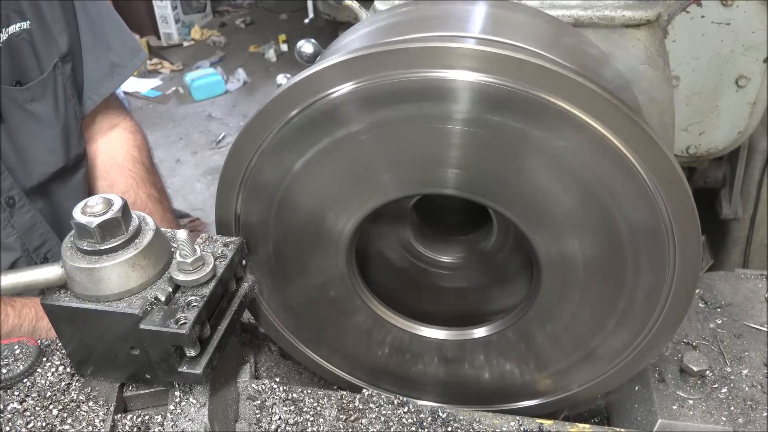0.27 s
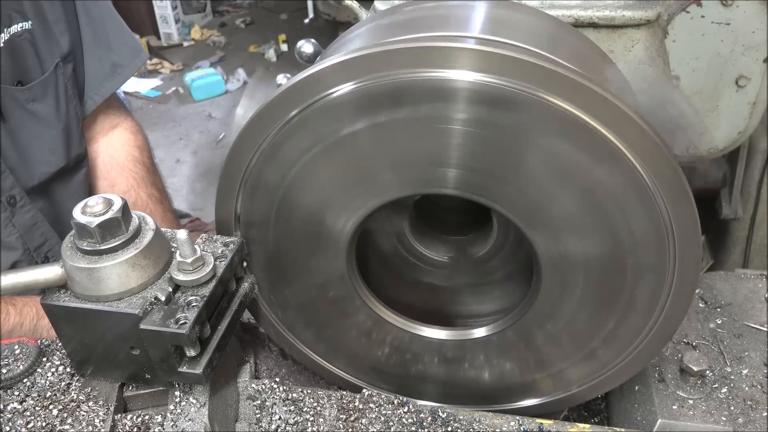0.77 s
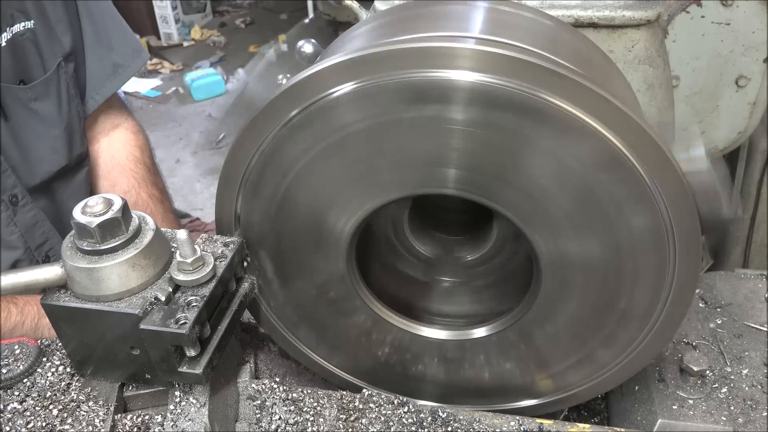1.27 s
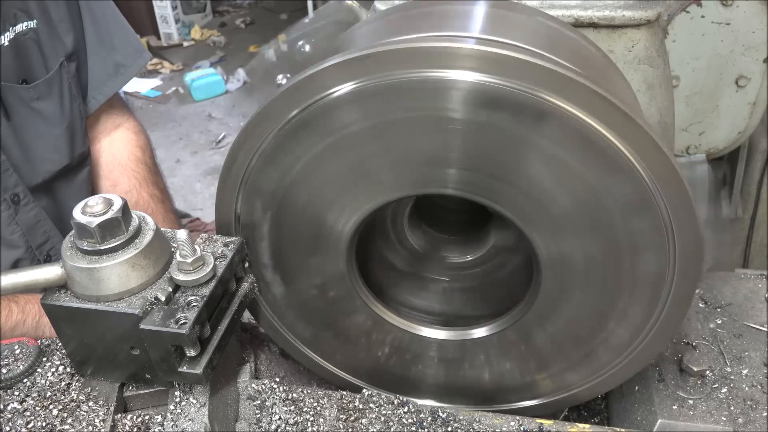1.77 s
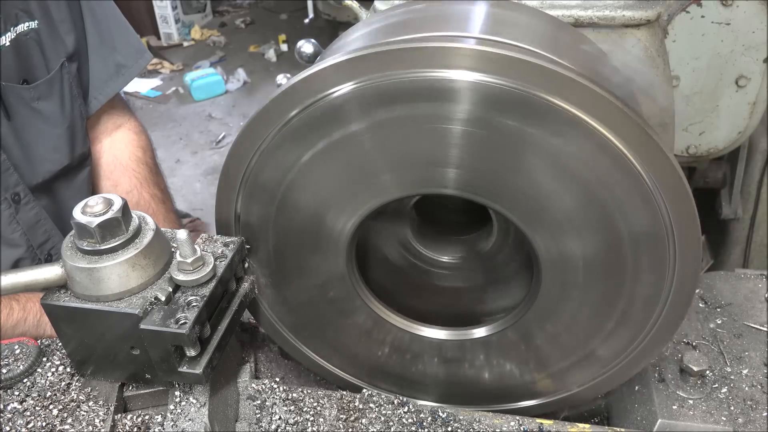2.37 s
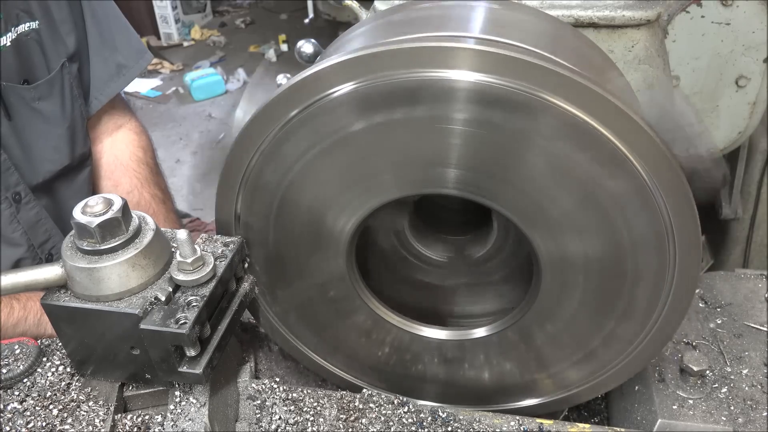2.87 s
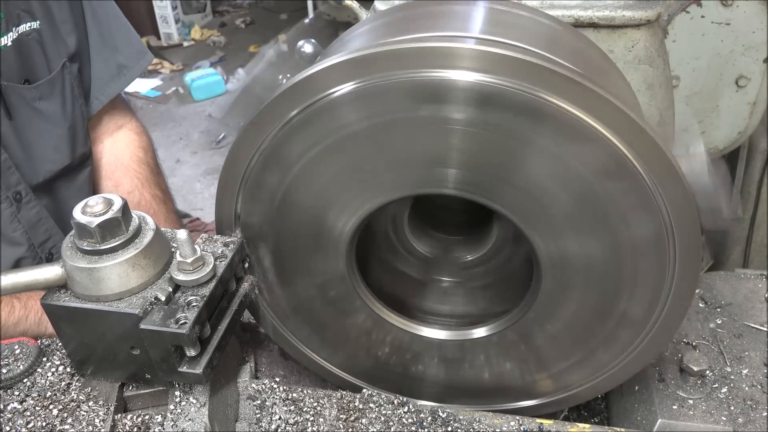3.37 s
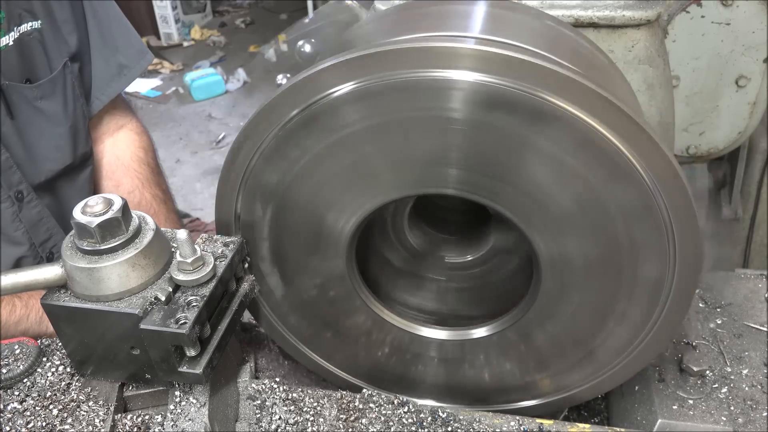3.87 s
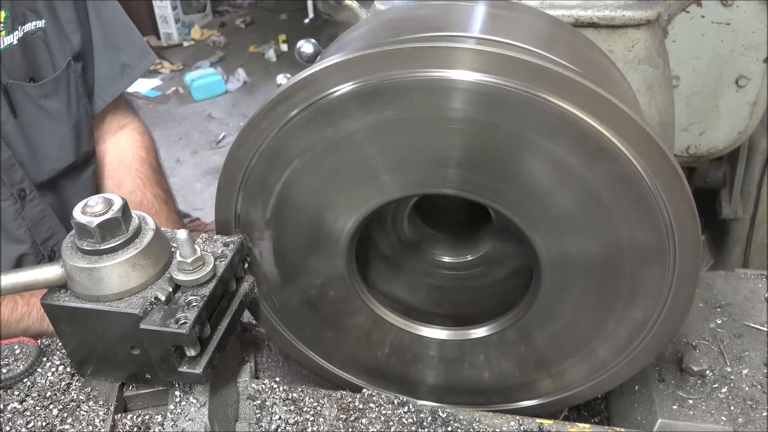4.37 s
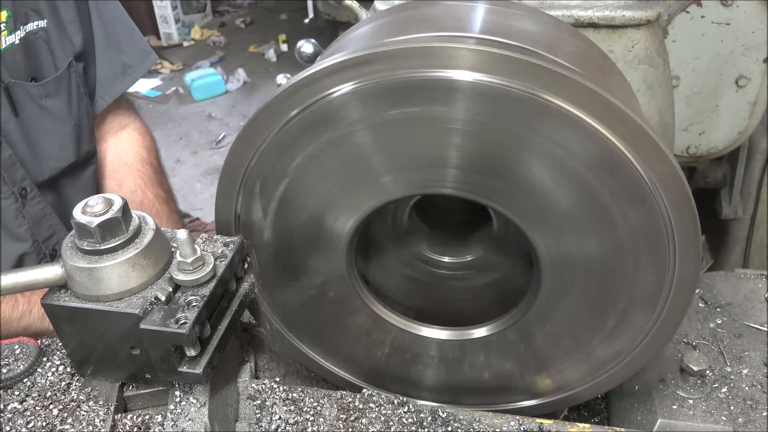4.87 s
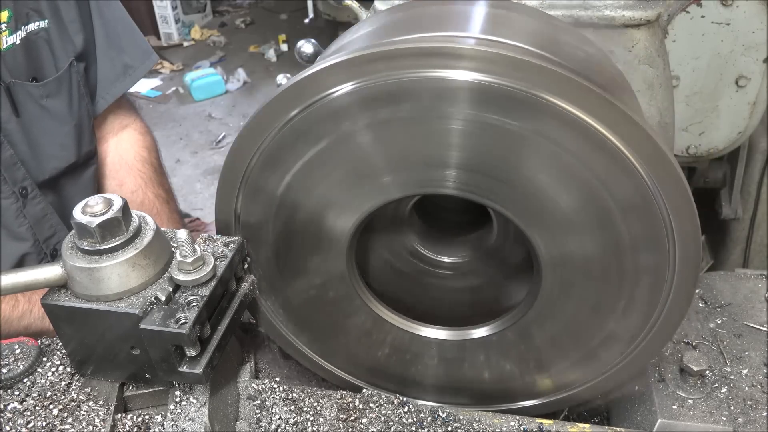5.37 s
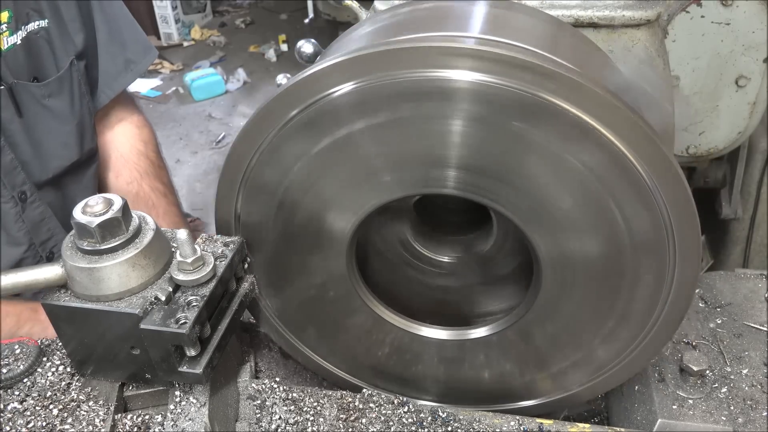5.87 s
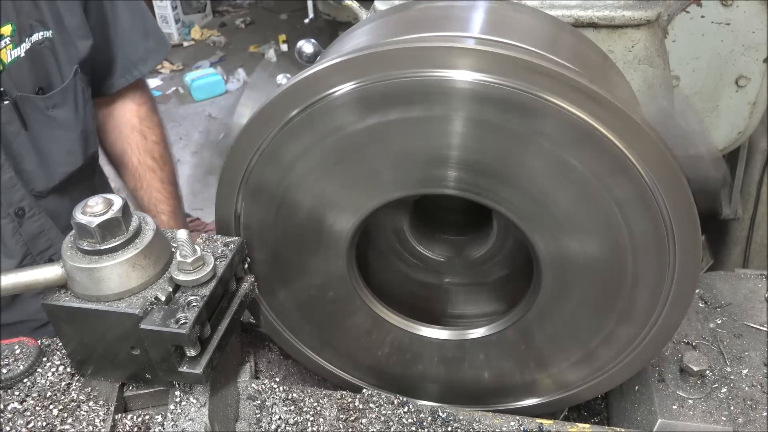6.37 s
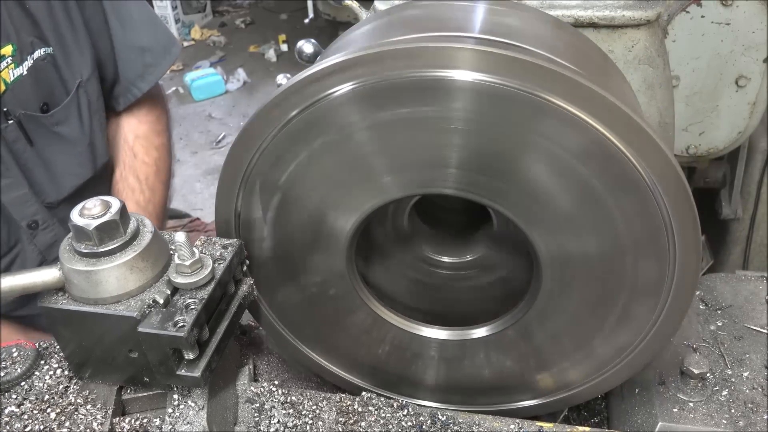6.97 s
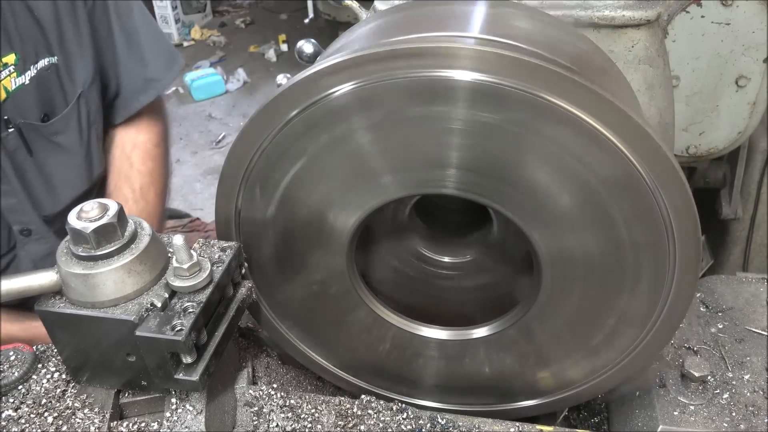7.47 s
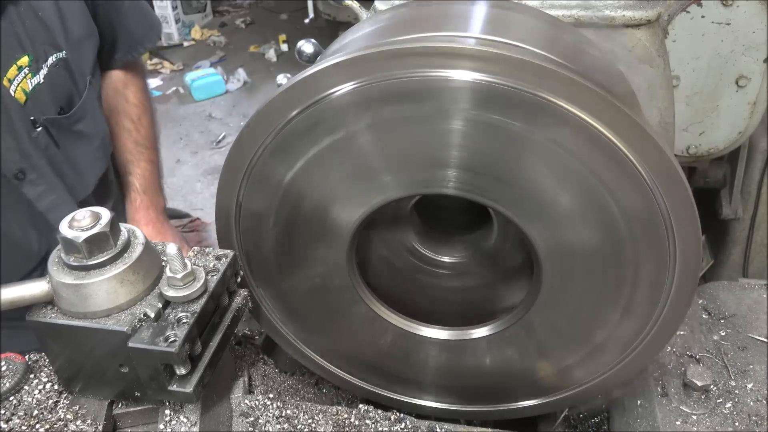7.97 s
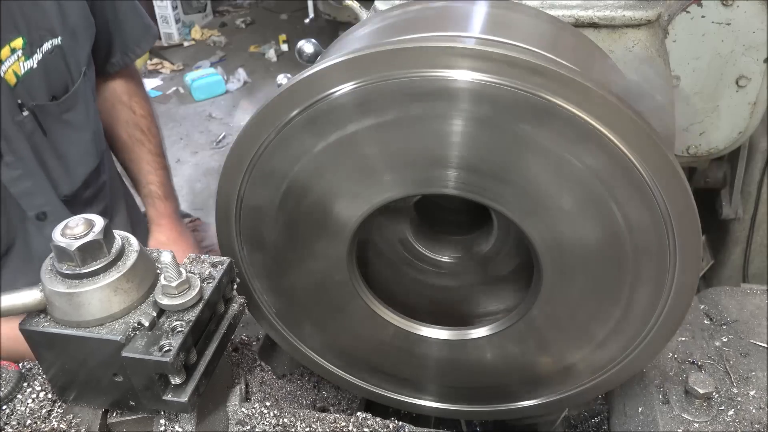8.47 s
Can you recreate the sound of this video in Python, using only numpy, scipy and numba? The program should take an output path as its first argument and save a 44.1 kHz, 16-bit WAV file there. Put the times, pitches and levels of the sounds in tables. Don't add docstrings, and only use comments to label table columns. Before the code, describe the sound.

Harsh ringing roar of steel being turned on a lathe, pulsing quickly, breaks into short barks and stops, uncovering a low gear rumble.

```python
import sys
import numpy as np
from scipy import signal
from scipy.fft import rfft, irfft, next_fast_len
from scipy.io import wavfile
from scipy.ndimage import uniform_filter1d
from numba import njit

SR = 44100
rng = np.random.default_rng(int(sys.argv[2]) if len(sys.argv) > 2 else 0)


def ratio_of_db(decibels):
    return 10 ** (np.asarray(decibels, float) / 20)


def digitize_waveform(pressure):
    field = np.atleast_2d(pressure).T
    bounded = np.clip(field, -1, 1)
    quanta = np.round(bounded * 32767).astype(np.int16)
    wavfile.write(sys.argv[1], SR, quanta)


N = 384552
STEP = 64
SPINDLE_PER_S, JAWS = 1.899, 3
CUT_ENDS = 7 * SR
FINE_MODES_HZ = 5000

# (frequency [Hz], likeness [0-1])
CUT_LIKENESS = [(500, .95), (800, .985), (2000, .985), (5000, .985), (5600, .97), (6300, .75), (6700, .9),
                (8000, .7), (8600, .3), (9000, .72), (10000, .7), (10600, .2), (11600, .4), (12700, .83),
                (14000, .55), (14600, .99)]
# (frequency [Hz], left over right [dB])
CUT_BALANCE = [(5600, 0.5), (7200, -1.5), (7800, 4), (9500, -2), (10400, -2.5), (12500, -2), (13700, -1.5),
               (14600, 0)]
# (frequency [Hz], phase [radians])
CUT_PHASE = [(5600, 0), (10200, -.2), (10800, 2.5), (11600, .3), (13000, -.1), (14000, -.8), (14600, 0)]


def cut():
    t = slow_time()
    depth, pressure_db, zone_db = tool_load(t)
    tearing_db = .5 * drift(40)
    out = ring_modes(t, depth, zone_db, tearing_db)
    out[:1, :CUT_ENDS] += bed_drone(t, pressure_db)
    out += chip_hiss(t, depth, zone_db, tearing_db)
    return ports(shop(out, wet_db=-11, t60=.3), CUT_LIKENESS, CUT_BALANCE, CUT_PHASE)


# (depth [dB], crest
# [cycles], depth [dB], crest [cycles])
UNEVEN_GRIP = [(0.3, 0.56, 0.67, 0.27), (0.7, 0.31, 0.3, 0.35), (0.7, 0.27, 1.0, 0.92),
               (0.9, 0.22, 0.1, 0.94), (0.33, 0.04, 0.37, 0.8), (0.8, 0.13, 0.36, 0.21),
               (0.42, 0.14, 0.99, 0.99), (0.47, 0.04, 0.1, 0.77), (0.57, 0.6, 0.9, 0.15),
               (0.7, 0.58, 0.1, 0.0), (1.1, 0.14, 0.7, 0.83), (0.7, 0.31, 0.3, 0), (0.3, 0.43, 0.3, 0.82),
               (1.1, 0.7, 0.3, 0.42), (0.99, 0.58, 0.6, 0.12), (0.9, 0.31, 0.5, 0.49),
               (0.5, 0.1, 0.6, 0.18), (0.4, 0.36, 0.2, 0.68), (0.4, 0.7, 0.8, 0.71), (0.6, 0.11, 0.3, 0.99),
               (0.9, 0.2, 0.5, 0.081), (0.6, 0.18, 0.4, 0.68), (0.4, 0.23, 0.3, 0.67),
               (0.1, 0.07, 0.2, 0.7), (0.3, 0.89, 0.33, 0.22), (1.4, 0.33, 0.69, 0.48),
               (0.3, 0.24, 0.6, 0.88), (0.37, 0.63, 0.45, 0.26), (0.6, 0.44, 0.7, 1),
               (0.6, 0.07, 0.33, 0.74)]
ZONE_EDGES_HZ = [400, 3000, 6300, 12200, 17000]


def ring_modes(t, depth, zone_db, tearing_db):
    cycles = SPINDLE_PER_S * t * np.array([[1], [2], [JAWS], [2 * JAWS], [3 * JAWS]])
    out = np.zeros((2, N))
    for (hz, width, db), grip in zip([*held_modes(cycles), *jaw_ridges(cycles)], UNEVEN_GRIP):
        grip_db = swells(grip, cycles[:2])
        centre_hz = hz.mean()
        level_db = zone_db[np.searchsorted(ZONE_EDGES_HZ, centre_hz) - 1]
        gain = ratio_of_db(level_db + db - 14.0 + grip_db + tearing_db + 0.87 * drift(30))
        channels = 1 if centre_hz < FINE_MODES_HZ else 2
        chip = rng.standard_normal((channels, CUT_ENDS), np.float32)
        wandering_hz = hz + 0.24 * width * drift(30)
        out[:channels, :CUT_ENDS] += resonate(chip, gain, wandering_hz, width * depth)
    return out


# (frequency [Hz], width [Hz], level [dB])
RING_MODES = [(850.0, 202, 3), (1136, 80, 2.5), (1235, 44, -4.5), (2610, 130, -2.5), (3330.0, 87, 4),
              (3710, 89, -1), (4090, 56, 1), (5250, 260, 0.5), (6044, 110, -4), (6740, 75, 0),
              (7050, 54, -4), (7476, 50, 4.5), (7665, 86, 6.5), (8270, 91, 5.5), (8154, 150, 2),
              (9000, 38, -7), (9810, 88, 3), (10420, 120, -3), (11250, 420, 5.5), (11760, 110, -0.5),
              (12700, 46, 7.5), (13000, 230, 2), (14500, 260, 0.5)]
# (depth [dB], crest [cycles], depth [dB], crest [cycles])
NODE_SWELLS = [(1.1, 0.71, 0.25, 0.08), (3.87, 0.2, 0.43, 0.082), (7.7, 0.093, 1.2, 0.6),
               (5.1, 0.015, 2.3, 0.59), (0.49, 0.16, 0.76, 0.69), (1.4, 0.059, 0.6, 0.51),
               (2.5, 0.65, 1.84, 0.8), (3.1, 0.87, 1.3, 0.62), (2.16, 0.064, 2.7, 0.34),
               (1.54, 0.24, 1.4, 0.78), (1.2, 0.07, 1.2, 0.18), (3, 0.56, 0.71, 0.83),
               (0.46, 0.64, 0.52, 0.98), (0.63, 0.82, 1, 0.55), (0.39, 0.64, 3.6, 0.26),
               (5.2, 0.38, 4.1, 0.35), (1.3, 0.73, 1.8, 0.22), (5.1, 0.12, 0.83, 0.53),
               (0.19, .08, .61, 0.036), (0.33, 0.96, 0.5, 0.29), (0.52, 0.64, 0.2, 0.38),
               (.7, 0.49, .6, 0.33), (1.7, 0.76, 1.2, 0.35)]
# (bend [Hz], crest [cycles], ripple [dB], crest [cycles])
CLAMP_BENDS = [(20, 0.91, 0.5, 0.62), (25.3, 0.17, 2.5, 0.62), (18, 0.57, 4, 0.38), (30, 0.2, 3.5, 0.25),
               (47, 0.96, 4, 0.96), (14, 0.49, 5.5, 0.4), (15, 0.065, 5.5, 0.82), (44, 0.73, 5, 0.081),
               (14, 0.071, 3, 0.21), (32, 1, 4, .66), (3, .66, 6.5, .01), (34, 0.84, 2.5, .03),
               (9, 1, -2.5, 0.37), (69, 0.087, 7.5, 0.67), (110, 0.82, 9, 0.27), (32, .21, 5, .01),
               (40, 0.045, 1.5, 0.63), (7, .06, 3.5, 0.98), (57, 0.2, 0.5, 0.55), (5, .47, 7, 0.85),
               (20, .09, 3.1, .01), (28, .65, 0, .1), (27, .38, 0, .01)]
SNAP, SNAP_LEAD = 0.54, 0.13


def held_modes(cycles):
    for (hz, width, db), nodes, clamp in zip(RING_MODES, NODE_SWELLS, CLAMP_BENDS):
        bend_hz, bend_at, ripple_db, ripple_at = clamp
        swing_db = 1.5 * swells(nodes, cycles[2:4])
        swing_db += ripple_db * np.cos(2 * np.pi * (cycles[4] - ripple_at))
        bend_cycles = cycles[3] if hz > FINE_MODES_HZ else cycles[2]
        turn = 2 * np.pi * (bend_cycles - bend_at)
        bend = np.cos(turn)
        if hz < FINE_MODES_HZ:
            bend += SNAP * np.cos(2 * turn + 2 * np.pi * SNAP_LEAD)
        yield hz + bend_hz * bend, width, db + swing_db


# (place in the jaw's pass # [cycles],
# frequency [Hz], level [dB])
JAW_PATHS = [
    [(0.03, 2370, 11.5), (0.14, 2526, 16), (0.25, 2303, 14), (0.4, 2260, 12), (0.54, 2290, 12.5),
     (0.68, 2335, 9), (0.82, 2530, 12.5), (0.93, 2400, 9)],
    [(.05, 1270, 7), (.2, 1583, 5.5), (.32, 1640, 12.5), (.45, 1397, 12), (.6, 1344, -1.5), (.72, 1380, 8),
     (.82, 1513, 11), (.92, 1687, 2)],
    [(0.1, 1967, -2), (0.22, 1740, 5), (0.32, 1780, 9), (0.45, 2035, 5), (0.55, 2050, 1.5),
     (0.65, 2056, 9.2), (0.78, 1982, 6), (0.95, 2095, 14.5)],
    [(.1, 1980, -12), (.28, 1920, -7), (.4, 1883, 6.5), (.55, 1930, 2.5), (.7, 1834, 1), (.85, 1846, 12),
     (.93, 1924, 6.5)],
    [(0.06, 4560, 13.5), (0.2, 4557, 13.5), (0.35, 4497, 14), (0.48, 4523, 16), (0.6, 4480, 4.5),
     (0.75, 4544, 6.5), (0.88, 4510, 6), (0.98, 4330, 14.5)],
    [(0.0, 3020, -2), (0.15, 2970, 1.4), (0.3, 2770, 4), (0.5, 2860, -14), (0.7, 2900, -6), (0.81, 2980, 7),
     (0.9, 2940, -4), (0.95, 3000, -1)],
    [(0.1, 5780, -7), (0.3, 5610, 6.5), (0.43, 5710, 8), (0.6, 5510, 2.5), (0.72, 5680, 5.5),
     (0.86, 5630, 11.5), (0.92, 5700, 2), (0.97, 5780, 6)],
]
JAW_PATH_WIDTHS_HZ = [76, 65, 55.6, 55, 38.5, 80, 85]
JAW_PATH_TRIMS_DB = [-1.3, -1.25, -1.45, -1.4, -1.05, -1.6, -1.2]


def jaw_ridges(cycles):
    for path, width, trim_db in zip(JAW_PATHS, JAW_PATH_WIDTHS_HZ, JAW_PATH_TRIMS_DB):
        at, hz, db = np.transpose(path)
        pitch_hz = np.interp(cycles[2], at, hz, period=1)
        level_db = trim_db + np.interp(cycles[2], at, db, period=1)
        yield pitch_hz, width, level_db


def swells(setting, cycles):
    depth_db, crest = np.reshape(setting, (2, 2)).T[:, :, None]
    return (depth_db * np.cos(2 * np.pi * (cycles - crest))).sum(0)


def bed_drone(t, pressure_db):
    noise = rng.standard_normal((1, CUT_ENDS), np.float32)
    hz, width_hz = np.full(len(t), 165.0), np.full(len(t), 31.0)
    return resonate(noise, ratio_of_db(-48.5 + 0.6 * pressure_db), hz, width_hz)


# (frequency [Hz], level per Hz [dB])
CHIP_SPECTRUM = [(300, -57), (500, -10), (2340, 0), (2860, -11), (4470, 0), (6410, -45), (7610, -3),
                 (9180, -5), (12500, 3), (14000, 0), (15600, -16)]


def chip_hiss(t, depth, zone_db, tearing_db):
    jaw_cycles = JAWS * SPINDLE_PER_S * t
    rubbing_db = zone_db[0] + 3.5 * np.cos(2 * np.pi * (jaw_cycles - .08))
    hiss = colour(rng.standard_normal((2, N)), CHIP_SPECTRUM)
    out = np.zeros((2, N))
    for level_db, lo, hi in zip([rubbing_db, *zone_db[1:]], ZONE_EDGES_HZ, ZONE_EDGES_HZ[1:]):
        band = signal.sosfilt(signal.butter(2, (lo, hi), "band", fs=SR, output="sos"), hiss)
        out += evened(band) * stretch(depth * ratio_of_db(level_db + tearing_db - 9.5))
    return out


# (time [s], depth [0-1])
CUT_DEPTH = [
    (0, 1),
    (5.74, 0.99),
    (5.77, 0.96),
    (5.88, 0.92),
    (5.93, 0.73),
    (6.36, 0.72),
    (6.46, 0.54),
    (7, 1),
]
# (full cut level [dB], gain as depth goes to 0 [dB],
# gain through a touch [dB], share of the pressure [1])
TOOL_ZONES = [
    (-31, 13, 2, 0.9),
    (-28, -10.5, 0, 1),
    (-29.5, -22.5, -7, 1.6),
    (-28, -42, 1, .8),
]


def tool_load(t):
    depth = np.clip(np.interp(t, *np.transpose(CUT_DEPTH)), .1, 1)
    pressure_db, through = contact(t)
    zone_db = []
    for full_db, thin_db, tilt_db, share in TOOL_ZONES:
        zone_db.append(full_db + thin_db * (1 - depth) + tilt_db * through + share * pressure_db)
    return depth, pressure_db, zone_db


# (start time [s], end time [s], level [dB], level of the gap after it [dB], bite time [s])
HIGH_SPOTS = [
    (5.926, 6.03, 1, -1.5, 0.025),
    (6.085, 6.215, 2, -2, .06),
    (6.243, 6.368, 0.9, -10.5, .03),
    (6.439, 6.538, -0.3, -20, 0.0099),
    (6.63, 6.73, -18, -45, .021),
]
FULL_CUT_ENDS_S, FIRST_GAP_DB, LEAVE_S = 5.88, -3.5, 0.013


def contact(t):
    start, end, strength_db, gap_db, bite = np.transpose(HIGH_SPOTS)
    before_db = np.append(FIRST_GAP_DB, gap_db[:-1])
    corners_s = np.array([start, start + bite, end, end + LEAVE_S]).T.ravel()
    corners_db = np.array([before_db, strength_db, strength_db, gap_db]).T.ravel()
    times_s = [FULL_CUT_ENDS_S, *np.sort(corners_s), CUT_ENDS / SR]
    pressure_db = np.interp(t, times_s, [0, *corners_db, 2 * corners_db[-1]])
    touch_s = np.array([start, end]).T.ravel()
    through = np.interp(t, [FULL_CUT_ENDS_S, *touch_s], [0, *[-.5, .5] * len(start)])
    return pressure_db, through


# (time [s], peak level [dB], frequency [Hz])
TOOL_GRABS = [
    (5.9321, -19, 2000),
    (5.9984, -15, 2360),
    (6.0113, -11, 2390),
    (6.0953, -20, 2540),
    (6.2569, -19, 2020),
    (6.3333, -9.5, 2570),
    (6.4405, -16, 2380),
    (6.4515, -17, 2430),
    (6.4749, -13, 2050),
]


def grabs():
    return strikes([(s, db - 10.5, hz) for s, db, hz in TOOL_GRABS], rise_s=0.0046)


# (time [s], peak level [dB], frequency [Hz])
TOOL_BRUSHES = [(6.36, -38, 4130), (6.37, -41, 3330), (6.375, -36, 2290), (6.535, -40, 3330),
                (6.54, -37, 2300), (6.485, -33, 4500), (6.516, -30, 4470), (6.55, -38, 2020),
                (6.56, -41, 1354), (6.575, -40, 830), (6.62, -35, 850), (6.63, -43, 2040),
                (6.645, -42, 4100), (6.665, -40, 2270), (6.69, -44, 3330), (6.685, -45, 4520),
                (6.71, -45, 2300), (6.73, -45, 4530)]


def brushes():
    return strikes(TOOL_BRUSHES, rise_s=.017)


# (time [s], peak level [dB])
SQUEAK_SLIPS = [
    (6.7096, -40),
    (6.7324, -35),
    (6.7385, -27),
    (6.7486, -25),
    (6.7644, -38),
    (6.7734, -37),
    (6.7805, -35),
    (6.7914, -33),
    (6.8044, -41),
]


def squeak():
    return strikes([(s, db, 12900) for s, db in SQUEAK_SLIPS], rise_s=.0028)


# (time [s], peak level [dB], frequency [Hz])
CHIP_TICK = [
    (7.201, -36, 5420),
    (7.202, -40, 4880),
    (7.203, -36, 3450),
]


def tick():
    return strikes(CHIP_TICK, rise_s=.0012)


def strikes(events, rise_s):
    out, t = np.zeros(N), np.arange(SR // 5) / SR
    for s, db, hz in events:
        start = round(s * SR)
        flutter_db = 2.0 * np.sin(2 * np.pi * (rng.uniform(16, 42) * t + rng.random()))
        swell = t / rise_s * np.exp(1 - t / rise_s) * ratio_of_db(flutter_db)
        out[start:start + len(t)] += ratio_of_db(db) * swell * np.sin(2 * np.pi * hz * t)
    return out * ratio_of_db(np.array([[-.5], [.5]]))


# (frequency [Hz], likeness [0-1])
SHOP_LIKENESS = [(30, .92), (130, .97), (1400, .98), (2000, .998), (5600, .995), (6800, .75), (8700, .2),
                 (10500, .3), (11500, .45), (14000, .7), (14700, .99)]
# (frequency [Hz], left over right [dB])
SHOP_BALANCE = [(30, -1), (110, 10.5), (200, 0), (380, -6), (800, -3), (1600, -1.5), (5800, -1.5),
                (8500, -4), (10500, -12), (11500, -1), (14600, -3)]
# (frequency [Hz], phase [radians])
SHOP_PHASE = [(5600, 0), (7600, -.9), (9500, 0), (10800, 2.2), (11800, .6), (14600, 0)]


def machine():
    t = np.arange(N) / SR
    opened_s = np.maximum(t - 5.51, 0)
    opened_db = 3 * opened_s
    hum = ratio_of_db(-48.5 + opened_db)
    tones = hum * motor_tones(t)
    noise = rumble(t, hum, opened_db)
    placed = ports(noise, SHOP_LIKENESS, SHOP_BALANCE, SHOP_PHASE)
    return placed + ports([tones, tones], [(0, 0.96)], SHOP_BALANCE, SHOP_PHASE)


# (frequency [Hz], level [dB], wavering width [Hz])
MOTOR_TONES = [(120, -41.5, .3), (241, -52, 9), (270, -49, 6), (330, -51, 5), (360, -46, 3), (916, -58, 20),
               (1320, -47.5, 2), (1440, -49, 3), (1938, -56, 8), (2120, -56.5, 5), (3579.4, -60, 2),
               (3588.5, -56, 2), (3607, -51.5, 3), (3783, -52.5, 5), (4522, -64, 9), (4963, -57, 6),
               (5378, -62, 8), (5970, -61, 8), (6148, -63, 8), (6595, -63, 8), (6741, -61, 9),
               (6892, -60, 9), (7776, -63, 9)]


def motor_tones(t):
    tones = np.zeros(N)
    shaft = 2 * np.pi * 23.0 * slow_time()
    for hz, db, width in MOTOR_TONES:
        wander_phase = 2 * np.pi * np.cumsum(width / 2 * drift(30.3)) * STEP / SR
        wander = stretch(wander_phase + 2 * np.pi * rng.random())
        flutter_db = np.tanh(width / 6) * (2.8 * drift(60) + 1.2 * np.sin(shaft + hz))
        tones += stretch(ratio_of_db(db + 43.0 + flutter_db)) * np.sin(2 * np.pi * hz * t + wander)
    return tones


# (frequency [Hz], level [dB])
RUMBLE_SPECTRUM = [(25, -42), (55, -32.5), (95, -32), (135, -8), (165, -8.5), (210, -1.5), (250, -3.5),
                   (400, -4.5), (650, -10.5), (930, -7), (1640, -15), (2000, -11.5), (2860, -20.5),
                   (7000, -18), (9000, -20), (13300, -18.5)]


def rumble(t, hum, opened_db):
    rough = colour(rng.standard_normal((2, N)), RUMBLE_SPECTRUM)
    noise = evened(shop(rough, wet_db=-13, t60=0.31))
    gears = signal.sosfilt(signal.butter(1, (140, 550), "band", fs=SR, output="sos"), noise)
    deep = signal.sosfilt(signal.butter(4, 85, fs=SR, output="sos"), noise)
    chatter_db = 3.5 * np.exp(-((t - 6.3) / 0.51) ** 2)
    jaws = 2 * np.pi * JAWS * SPINDLE_PER_S * t
    load_db = 0.28 * np.cos(jaws) + 0.072 * np.sin(jaws)
    gears_db = -45 + opened_db + chatter_db + load_db + stretch(1.2 * drift(25))
    noise = (noise - gears) * hum * ratio_of_db(6.0) + gears * ratio_of_db(gears_db + 3.0)
    noise = signal.sosfilt(signal.butter(2, 90, "high", fs=SR, output="sos"), noise)
    return noise + deep * ratio_of_db(-26.5)


def shop(pair, wet_db, t60):
    length = SR // 4
    taps = np.zeros((2, length))
    at = np.arange(60, length - 20, 20) + rng.integers(0, 20, (2, (length - 61) // 20))
    np.put_along_axis(taps, at, rng.choice([-1., 1.], at.shape), 1)
    taps *= ratio_of_db(-60 * np.arange(length) / SR / t60)
    wet = signal.oaconvolve(pair, taps / np.linalg.norm(taps[0]), axes=1)[:, :N]
    return pair + ratio_of_db(wet_db) * wet


def ports(pair, same, pan, lead):
    size = next_fast_len(N)
    hz = np.fft.rfftfreq(size, 1 / SR)
    direct, other = rfft(pair, size)
    likeness, pan_db = np.clip(read(same, hz), 0, 1), read(pan, hz)
    right = likeness * direct * np.exp(-1j * read(lead, hz))
    right += np.sqrt(1 - likeness ** 2) * other
    return irfft([direct * ratio_of_db(pan_db / 2), right * ratio_of_db(-pan_db / 2)], size)[:, :N]


@njit
def resonate(x, gain, hz, width):
    out = np.zeros(x.shape)
    r = np.exp(-np.pi * width / SR)
    pull = 2 * r * np.cos(2 * np.pi * hz / SR)
    scale = gain * np.sqrt((1 - r * r) / 2)
    for ch in range(len(x)):
        for n in range(2, x.shape[1]):
            k = n // STEP
            drive = scale[k] * (x[ch, n] - x[ch, n - 2])
            out[ch, n] = drive + pull[k] * out[ch, n - 1] - r[k] ** 2 * out[ch, n - 2]
    return out


def colour(x, points):
    size = next_fast_len(N)
    gain = ratio_of_db(read(points, np.fft.rfftfreq(size, 1 / SR)))
    return irfft(rfft(x, size) * gain, size)[..., :N]


def read(points, hz):
    f, value = np.transpose(points)
    return np.interp(np.log(hz + 1), np.log(f + 1), value)


def evened(x):
    return x / np.sqrt(np.mean(x ** 2) + 1e-20)


def slow_time():
    return np.arange(N // STEP + 1) * STEP / SR


def drift(per_s):
    length = max(2, round(SR / STEP / per_s))
    noise = rng.standard_normal(N // STEP + 1)
    return evened(uniform_filter1d(uniform_filter1d(noise, length), length))


def stretch(slow):
    return np.interp(np.arange(N) / STEP, np.arange(len(slow)), slow)


def scene():
    return cut() + grabs() + brushes() + squeak() + tick() + machine()


def top_cut(x):
    return signal.sosfilt(signal.butter(12, 15800, fs=SR, output="sos"), x)


# (frequency [Hz], level [dB])
TREBLE_END = [(14200, 0), (14800, -10), (15100, -22), (15300, -30), (16000, -28)]


def record(dry):
    ceiling = .45
    limited = ceiling * np.tanh(dry / ceiling)
    return top_cut(colour(limited, TREBLE_END))


dry = scene()
out = record(dry)
digitize_waveform(out)
```